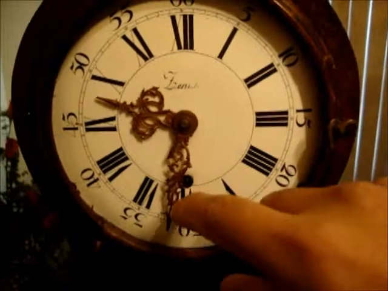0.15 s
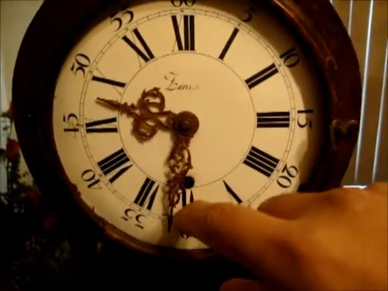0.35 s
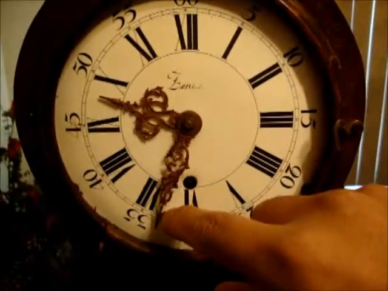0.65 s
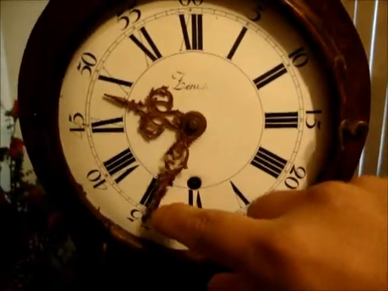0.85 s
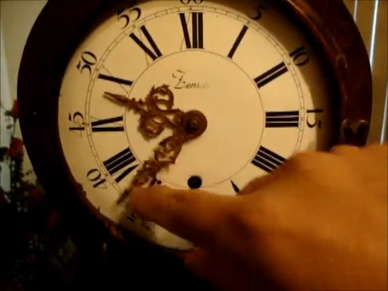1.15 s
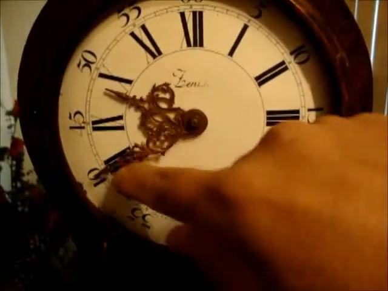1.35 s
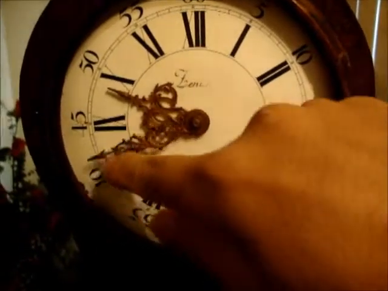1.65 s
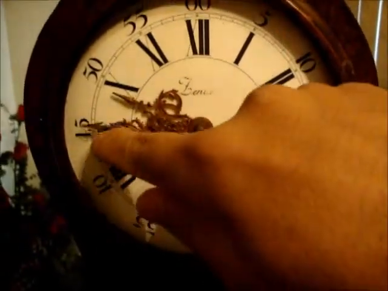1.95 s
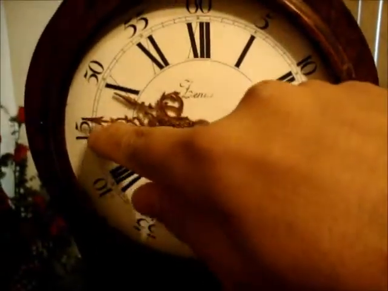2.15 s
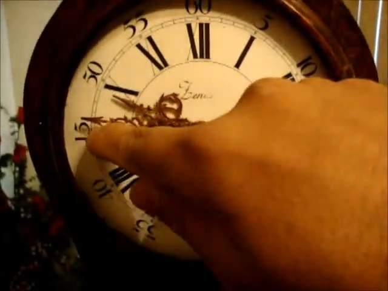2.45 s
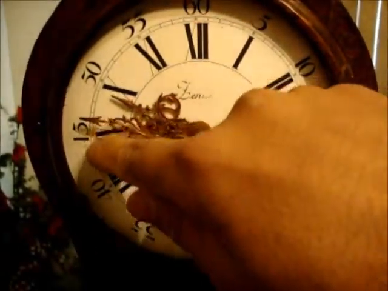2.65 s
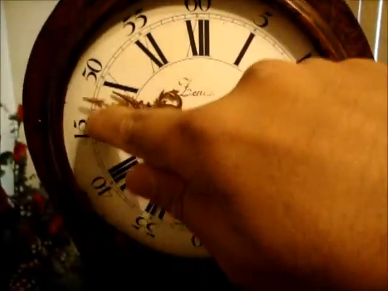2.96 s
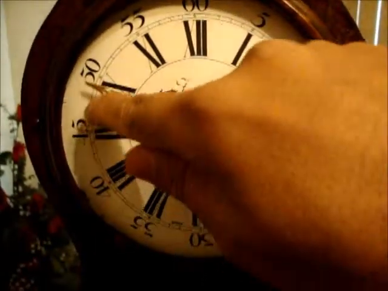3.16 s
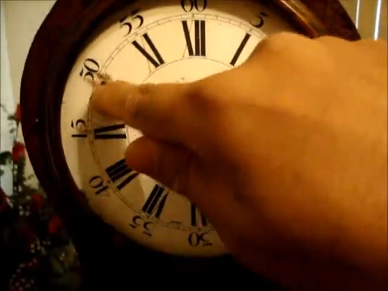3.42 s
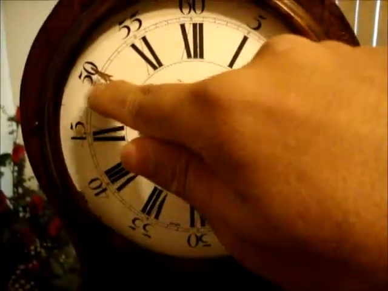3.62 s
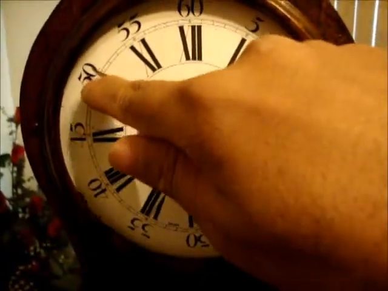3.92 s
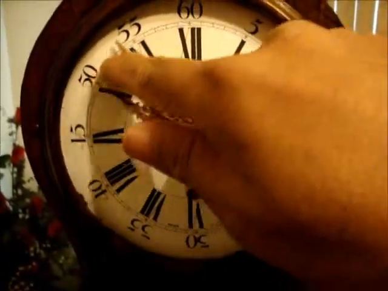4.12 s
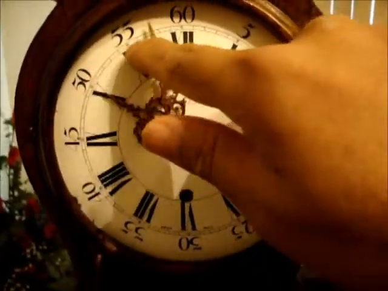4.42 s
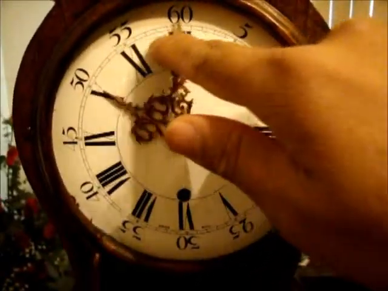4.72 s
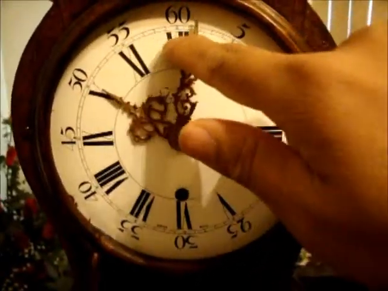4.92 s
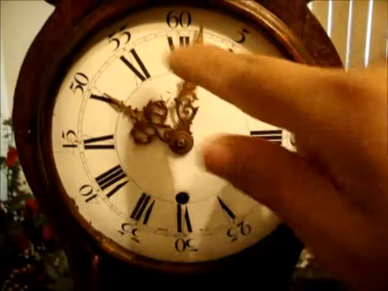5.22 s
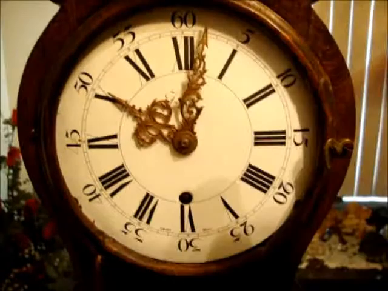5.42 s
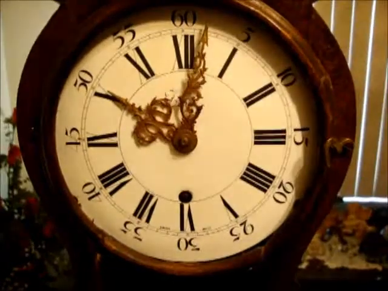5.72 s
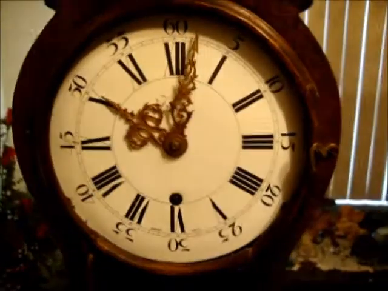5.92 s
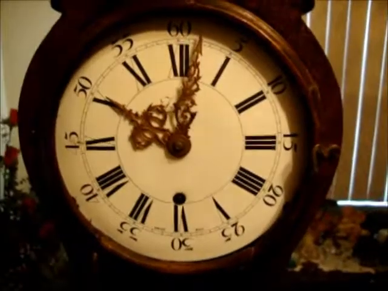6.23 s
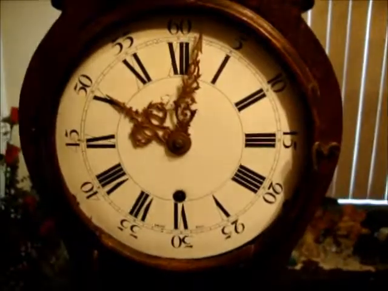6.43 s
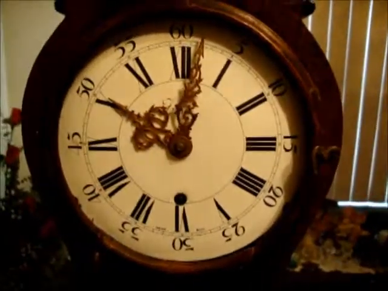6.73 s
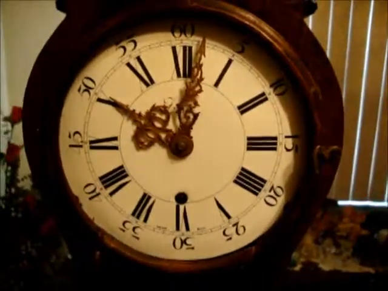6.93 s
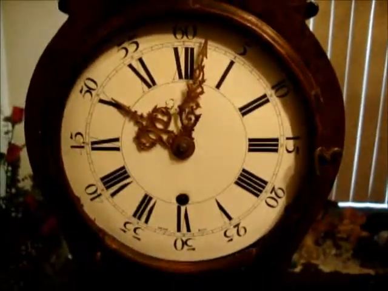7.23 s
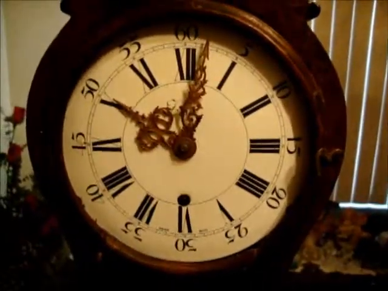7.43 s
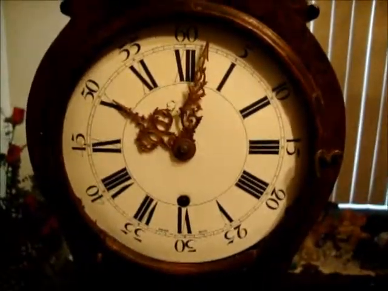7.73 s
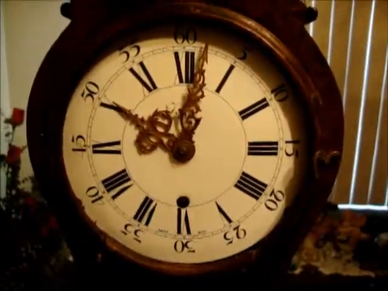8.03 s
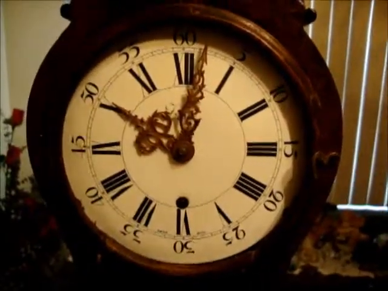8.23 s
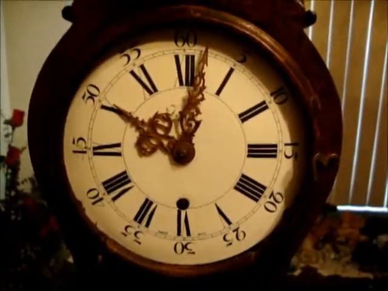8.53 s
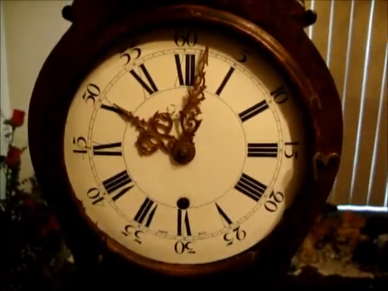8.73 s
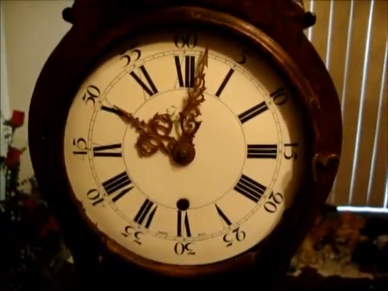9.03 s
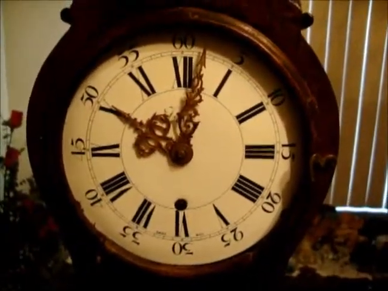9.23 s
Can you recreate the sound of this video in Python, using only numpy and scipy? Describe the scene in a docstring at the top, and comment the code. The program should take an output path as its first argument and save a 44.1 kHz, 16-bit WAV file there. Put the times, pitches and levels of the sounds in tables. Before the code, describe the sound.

Close to a mantle clock in a quiet room with faint air noise and a distant throbbing hum. A previous bell note fades while the clock ticks and a finger softly rubs the hand and dial. Metal levers click, then slip in a quick clatter. A faint whir rises, and six bright, piercing bell strikes follow at an even pace, each cracking sharply and cutting off the last ring.

```python
"""A quiet room with a mantle clock: steady air noise, and a motor's beating hum lines far off.
A finger rubs hand and dial (band noise) as it pushes the minute hand round, with soft rustles later;
uneven ticks and lever clicks ring the plates (resonators). Faint hiss and tones rise as the striking
train is released. A hammer strikes a small bell: noise cracks, then decaying partials whose split pairs
beat, with random roughness laid over them. The recorder's gain control sinks under the bell."""
import sys
import numpy as np
from scipy import signal
from scipy.fft import rfft, irfft
from scipy.io import wavfile
from scipy.ndimage import uniform_filter1d

SR = 44100
rng = np.random.default_rng(int(sys.argv[2]) if len(sys.argv) > 2 else 0)


def put_to_file(sound):
    """Save the sound as 16-bit audio at rate SR, in the file named by the first command-line argument."""
    columns = np.atleast_2d(sound).T  # one column per channel
    safe = np.clip(columns, -1, 1)
    whole_steps = np.round(safe * 32767)
    wavfile.write(sys.argv[1], SR, whole_steps.astype(np.int16))


N = 413209  # samples


def amp(db):
    """Decibels to gain."""
    return 10 ** (np.asarray(db, float) / 20)


def rms_one(x):
    """Scale to unit rms."""
    return x / np.sqrt(np.mean(x ** 2) + 1e-20)


def colour(x, spectrum):
    """Shape by a spectrum, floored at -60 dB; minimum phase, so nothing sounds early."""
    hz, db = np.transpose(spectrum)
    grid_hz = np.linspace(1, SR / 2, 2049)
    grid_db = np.interp(np.log(grid_hz), np.log(hz), np.maximum(db, -60))
    cepstrum = irfft(grid_db * np.log(10) / 20)
    cepstrum[1:2048] *= 2  # fold to the causal half
    cepstrum[2049:] = 0
    impulse = irfft(np.exp(rfft(cepstrum)))
    return signal.oaconvolve(x, rms_one(impulse) / 64)[:N]  # unit energy: 64 = sqrt(4096 taps)


def resonate(x, modes):
    """Parallel two-pole resonances (hz, width_hz, level_db), signs alternating."""
    out = 0
    for k, (hz, width_hz, level_db) in enumerate(modes):
        r = np.exp(-np.pi * width_hz / SR)
        poles = [1, -2 * r * np.cos(2 * np.pi * hz / SR), r * r]
        ring = signal.lfilter([1, 0, -1], poles, x + 1e-18)
        out = out + (-1) ** k * amp(level_db) * (1 - r * r) / 2 * ring
    return out


def drift(rate_hz):
    """Random wander: normal knots, two per cycle of the rate, joined by straight lines."""
    knots_s = np.arange(0, N / SR + 1, .5 / rate_hz)
    return np.interp(np.arange(N) / SR, knots_s, rng.standard_normal(len(knots_s)))


def add(out, x, start_s, peak_db):
    """Mix in a short sound at the given peak level."""
    at = round(start_s * SR)
    out[at:at + len(x)] += (amp(peak_db) * x / np.abs(x).max())[:N - at]


# air noise spectrum: hz, level_db (per Hz, relative)
ROOM_SPECTRUM = [(18, -65), (30, -33.5), (189, -13), (241, -7), (316, -9), (762, -7.5), (998, -12.5),
                 (1510, -14.5), (1890, -25), (2410, -22), (3480, -27.5), (3840, -21.5), (4140, -29.5),
                 (9290, -32.5), (10500, -46.5), (13600, -78), (22000, -120)]
ROOM_RMS_DB = -50.5


def room_air():
    """Steady shaped noise, its level wavering slightly."""
    air = rms_one(colour(rng.standard_normal(N), ROOM_SPECTRUM))
    return amp(ROOM_RMS_DB + 0.57 * drift(6)) * air


# far motor's hum lines: hz, peak_db (mean)
HUM_LINES = [(161, -75.5), (235.39, -59), (239.98, -61), (258.5, -74), (462.2, -66)]
HUM_IN_STEP_S = .11  # all lines in phase


def motor_hum():
    """Wavering sine lines; the close pair throbs at its difference frequency."""
    t = np.arange(N) / SR - HUM_IN_STEP_S
    return sum(amp(db + 1.3 * drift(7.4)) * np.cos(2 * np.pi * hz * t) for hz, db in HUM_LINES)


# finger on hand and dial, later soft rustles nearby: start_s, peak_db, centre_hz, width_hz, length_s
RUBS = [(0, -36.5, 1740, 1490, 0.059), (0.232, -40, 1200, 298, 0.14), (0.934, -37, 1200, 1000, 0.12),
        (1.854, -35, 1160, 980, 0.12), (2.836, -41, 2400, 1490, 0.081), (3.732, -34, 1420, 1200, 0.13),
        (3.776, -40, 4200, 600, 0.096), (4.383, -36, 600, 503, 0.077), (4.714, -38, 2000, 1220, 0.093),
        (4.8, -41, 1190, 300, 0.19), (5.627, -36.5, 980, 900, .06), (5.843, -27.5, 2090, 900, 0.12),
        (7.499, -33, 910, 900, 0.12), (9.246, -33, 1120, 297, 0.079)]


def rubs_and_rustles():
    """Finger rubs and later soft rustles: uneven puffs of noise, strongest in one band."""
    out = np.zeros(N)
    t = np.arange(9000) / SR
    for start_s, peak_db, centre_hz, width_hz, length_s in RUBS:
        swell = np.minimum(t / 0.0079, 1) * np.exp(-(t / length_s) ** 2)
        puff = swell * amp(2.4 * drift(60)[:len(t)])
        broad = resonate(rng.standard_normal(len(t)) * puff, [(centre_hz, 2 * width_hz, 0)])
        narrow = resonate(broad, [(centre_hz, width_hz, 0)])
        add(out, narrow + amp(-11.5) * broad, start_s, peak_db)
    return out


# modes of movement plates and case: hz, width_hz, level_db (before weighting by the struck part)
CASE_MODES = [(1080, 260, -6.5), (1290, 200, -2), (1842, 150, -3), (2290, 100, -3), (2728, 127, -1),
              (3540, 205, -6), (4150, 120, -3.5), (4503, 130, -5), (5077, 196, -3), (6360, 320, -9),
              (7000, 250, -9), (8550, 700, -13), (8820, 64, -2), (9950, 470, -2.5)]
RATTLE_RISE_S = .0015


def rattle(length_s, centre_hz, octaves):
    """A flurry of uneven metal contacts; modes near the struck part's pitch ring most."""
    t = np.arange(4000) / SR
    contacts = rng.standard_normal(len(t)) * amp(6.9 * rng.standard_normal(len(t)))
    decay = np.exp(-(t / length_s) ** 2) + amp(-4.5) * np.exp(-t / 0.0092)
    shape = np.minimum(t / RATTLE_RISE_S, 1) * decay
    modes = []
    for hz, width_hz, level_db in CASE_MODES:
        loss_db = min(6 * (np.log2(hz / centre_hz) / octaves) ** 2, 13)
        modes.append((hz, width_hz, level_db - loss_db))
    return resonate(contacts * shape, modes)


# escapement ticks: full_s (end of rise), peak_db
TICKS = [(.096, -33), (.453, -32.5), (.921, -30.5), (1.277, -26.5), (1.754, -30), (2.104, -27),
         (2.583, -34), (2.930, -26.5), (3.414, -28), (3.768, -31.5), (4.240, -29.5), (4.597, -25),
         (5.065, -28), (5.411, -26.5), (5.887, -28), (6.260, -26), (6.728, -24), (7.092, -21), (7.577, -27),
         (7.920, -26.5), (8.391, -20.5), (8.752, -28)]


def escapement():
    """Each tick is a short rattle of the plates."""
    out = np.zeros(N)
    for full_s, peak_db in TICKS:
        add(out, rattle(length_s=0.013, centre_hz=4900, octaves=1), full_s - RATTLE_RISE_S, peak_db)
    return out


# levers and wheels in the movement: full_s (end of rise), peak_db, pitch_hz (loudest part), length_s
LEVERS = [(0.872, -38, 5200, .008), (0.963, -35, 5500, 0.0046), (0.999, -34, 4850, 0.012),
          (1.415, -37.5, 5070, 0.0071), (1.441, -31, 4300, 0.0074), (2.154, -26, 4480, .012),
          (2.249, -33.5, 1990, .005), (2.459, -37.5, 4900, 0.017), (3.019, -40.5, 4540, .005),
          (3.548, -23.5, 4840, .015), (3.684, -34.5, 4630, 0.0047), (3.833, -19.5, 4300, 0.0096),
          (4.446, -19, 6500, 0.0082), (4.885, -35.5, 6500, 0.0051), (4.908, -25.5, 3880, 0.021),
          (5.428, -31.5, 4700, .007), (5.69, -20.5, 2800, .015), (6.189, -27, 7500, .007),
          (6.858, -21, 7000, 0.0097)]
LEVER_OCTAVES = 0.81
# one lever slipping over a cam: full_s (end of rise), peak_db
SLIPS = [(4.392, -15.5), (4.401, -15), (4.407, -18.5), (4.42, -18.5), (4.432, -26), (4.451, -21.5)]
SLIP_S, SLIP_HZ, SLIP_OCTAVES = 0.011, 3920, 0.22


def levers():
    """Clicks at each part's own pitch; the slipping lever rings on a narrow one."""
    out = np.zeros(N)
    for full_s, peak_db, pitch_hz, length_s in LEVERS:
        add(out, rattle(length_s, pitch_hz, LEVER_OCTAVES), full_s - RATTLE_RISE_S, peak_db)
    for full_s, peak_db in SLIPS:
        add(out, rattle(SLIP_S, SLIP_HZ, SLIP_OCTAVES), full_s - RATTLE_RISE_S, peak_db)
    return out


# gear tones: hz, width_hz, level_db (relative)
GEARS = [(1849, 28, 3.5), (2260, 15, -5), (4030, 40, -17), (4195, 75, -2), (4750, 47, -9), (9850, 180, 0)]
# whir hiss spectrum: hz, level_db (per Hz, relative)
WHIR_HISS = [(200, -31), (600, -6), (1500, -9), (2700, -7.5), (4000, -8.5), (7000, -11.5), (9800, -13),
             (11000, -16.5)]
WHIR_START_S, SPIN_UP_S = 5, 0.48  # release, time constant of the rise
WHIR_FLOOR_DB, WHIR_RUN_DB, WHIR_SAG_DB_PER_S = -63, -44, 0.87  # rms of the tones alone


def striking_train():
    """Faint steady hiss and tones in the floor, rising at the train's release, then sagging."""
    t = np.maximum(np.arange(N) / SR - WHIR_START_S, 0)
    spin_up_db = (WHIR_FLOOR_DB - WHIR_RUN_DB) * np.exp(-t / SPIN_UP_S)
    level_db = WHIR_RUN_DB + spin_up_db - WHIR_SAG_DB_PER_S * t
    tones = rms_one(resonate(rng.standard_normal(N), GEARS))
    hiss = rms_one(colour(rng.standard_normal(N), WHIR_HISS))
    return amp(level_db + 1.3 * drift(17)) * (tones + amp(2.5) * hiss)


# hammer blows: blow_s, ring_db, bright_db (high pair), mid_up_db, high_up_db (upper over lower partial),
# mid_in_step_s, swell_s, bounce_s (these three after the blow)
BLOWS = [(-.027, -24.5, -20, -1.5, -36, 0.017, .001, .001), (5.742, -3.5, -1, -2, -8.5, .016, 0.061, 0.06),
         (6.46, -.5, 0, -0.5, -16, .015, 0.049, 0.047), (7.134, 0.5, -1, -3, -19.5, .023, 0.028, .043),
         (7.799, 1, 0, -1, -15.5, 0.018, 0.037, 0.04), (8.472, -1.5, -5, -1.5, -19, 0.023, 0.023, .042),
         (9.158, 0, 0, -9.5, -13.5, .018, 0.035, .046)]
BOUNCE_PEAK_DB, BOUNCE_GAP_S = -23.5, .037


def hammer_bounces():
    """The hammer settles in two small rattling bounces."""
    out = np.zeros(N)
    for blow_s, *_, bounce_s in BLOWS[1:]:
        for k in range(2):
            full_s = blow_s + bounce_s + k * BOUNCE_GAP_S
            bounce = rattle(length_s=0.0099, centre_hz=2520, octaves=1)
            add(out, bounce, full_s - RATTLE_RISE_S, BOUNCE_PEAK_DB)
    return out


# crack spectrum: hz, level_db (per Hz, relative)
CRACK_SPECTRUM = [(100, -44), (700, -28), (1750, -9.5), (2440, -16.5), (3200, -0.5), (4040, -7.5),
                  (4900, -4), (6000, -7), (7000, 2), (8800, -18), (9900, 3), (11000, -23.5)]
CRACK_PEAK_DB, FIRST_CRACK_PEAK_DB = 0.1, -1.5  # first crack is softest
THUMP_DB, THUMP_S = -35, 0.0032  # level re crack, length


def hammer_cracks():
    """Noisy double contact of the hammer; a smooth low bump sounds with each crack."""
    out = np.zeros(N)
    t = np.arange(600) / SR
    thump = np.sin(np.pi * np.minimum(t / THUMP_S, 1)) ** 2
    for k, (blow_s, *_) in enumerate(BLOWS[1:]):
        peak_db = CRACK_PEAK_DB if k else FIRST_CRACK_PEAK_DB
        chatter = 0.32 * rng.standard_normal(len(t)) * np.exp(-((t - .004) / 0.0025) ** 2)
        chatter[[round(.002 * SR), round(.005 * SR)]] += [.7, -1]  # two touches
        add(out, colour(chatter, CRACK_SPECTRUM), blow_s - .002, peak_db)
        add(out, thump, blow_s, peak_db + THUMP_DB)
    return out


# five partials, low, mid pair, high pair: pitch_hz
BELL_HZ = [1399.3, 3708.9, 3724.72, 6734.6, 6747.5]
# the same five: t60_s
BELL_T60_S = [2.78, 7.9, 11.5, 2.2, 2.95]
# the same five: missing_share (of amplitude, at the blow)
SWELL_DEPTH = [0.82, 0.84, .75, .65, 0.42]
# low partial, mid pair, high pair: level_db (re ring_db, before brightness and pair balance)
BELL_DB = [-28.5, -19, -4.5]
# random roughness laid over the low, mid and high ringing tones: share, rate_hz
ROUGHNESS = [(.03, 40.6), (.1, 299), (.2, 112.1)]
# case hum after a blow: hz, level_db (re ring_db), t60_s
CASE_RING = (199, -60.5, 1.7)
HIGH_IN_STEP_S = .068  # high pair first in phase, after the blow
STOP_S = 0.014  # time constant of the hammer stopping the old ring


def bell_ring():
    """Each blow stops the old ring and restarts the decaying partials; the first precedes the start."""
    out, time_s = np.zeros(N), np.arange(N) / SR
    low, mid, high = [1 + share * (drift(rate_hz) + 1j * drift(rate_hz)) for share, rate_hz in ROUGHNESS]
    roughness = [low, mid, mid, high, high]
    low_db, mid_db, high_db = BELL_DB
    stops_s = [blow[0] for blow in BLOWS[1:]] + [99]  # last ring is never stopped
    for blow, stop_s in zip(BLOWS, stops_s):
        blow_s, ring_db, bright_db, mid_up_db, high_up_db, mid_in_step_s, swell_s, _ = blow
        span = slice(max(round(blow_s * SR), 0), round((stop_s + .05) * SR))
        t = time_s[span] - blow_s
        held = np.exp(-np.maximum(t + blow_s - stop_s, 0) / STOP_S)
        missing = np.exp(-(t / swell_s) ** 2)
        in_step_s = [0, mid_in_step_s, mid_in_step_s, HIGH_IN_STEP_S, HIGH_IN_STEP_S]
        bright_high_db = high_db + bright_db
        parts_db = [low_db, mid_db - mid_up_db / 2, mid_db + mid_up_db / 2,
                    bright_high_db, bright_high_db + high_up_db]
        partials = zip(BELL_HZ, BELL_T60_S, in_step_s, parts_db, roughness, SWELL_DEPTH)
        for hz, t60_s, peak_s, part_db, rough, depth in partials:
            tone = rough[span] * np.exp(2j * np.pi * hz * (t - peak_s))
            decay = amp(ring_db + part_db - 60 * t / t60_s)
            out[span] += held * (1 - depth * missing) * decay * tone.real
        hz, case_db, t60_s = CASE_RING
        out[span] += held * amp(ring_db + case_db - 60 * t / t60_s) * np.sin(2 * np.pi * hz * t)
    return out


def scene():
    """All sources at one microphone."""
    background = room_air() + motor_hum() + rubs_and_rustles()
    clockwork = escapement() + levers() + striking_train()
    strike = hammer_bounces() + hammer_cracks() + bell_ring()
    return (background + clockwork + strike)[None]


THRESHOLD_DB, CUT_DB_PER_DB = -24.5, 0.73
GRIP_S, RELEASE_DB_PER_S = 0.0089, 2.2
CUTOFF_HZ = 10800


def record(dry):
    """Gain control grips quickly, lets go slowly; peaks are rounded, the top is cut."""
    level_db = 10 * np.log10(uniform_filter1d(dry[0] ** 2, size=1500) + 1e-12)
    cut_db = CUT_DB_PER_DB * np.maximum(level_db - THRESHOLD_DB, 0)
    ramp_db = RELEASE_DB_PER_S * np.arange(N) / SR
    cut_db = np.maximum.accumulate(cut_db + ramp_db) - ramp_db  # peak hold, linear release
    grip = np.exp(-1 / (GRIP_S * SR))
    cut_db = signal.lfilter([1 - grip], [1, -grip], cut_db)
    wet = 0.78 * np.tanh(dry * amp(-cut_db) / 0.64)
    return signal.sosfilt(signal.cheby2(12, 60, CUTOFF_HZ, fs=SR, output="sos"), wet)


dry = scene()
out = record(dry)
put_to_file(out)
```